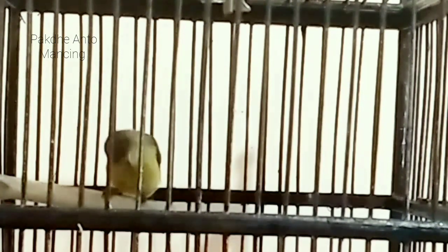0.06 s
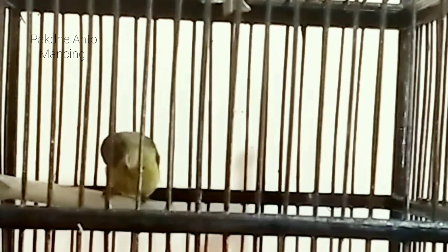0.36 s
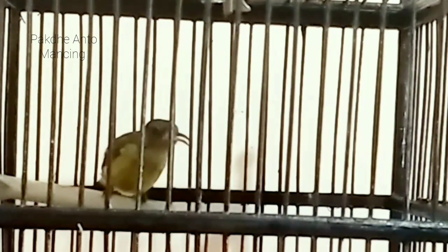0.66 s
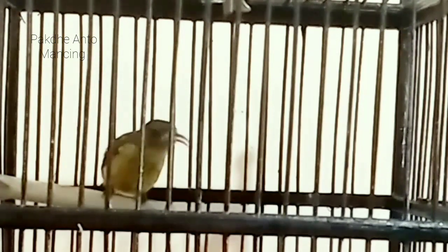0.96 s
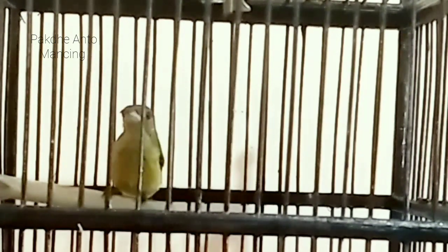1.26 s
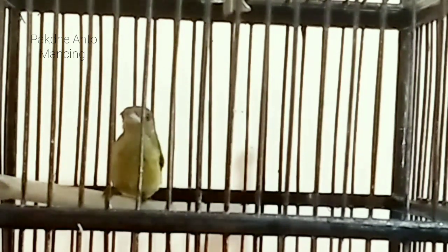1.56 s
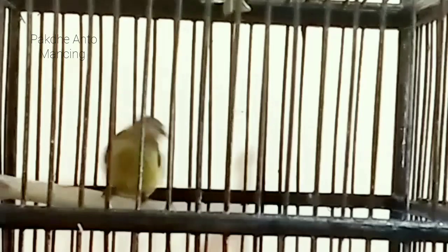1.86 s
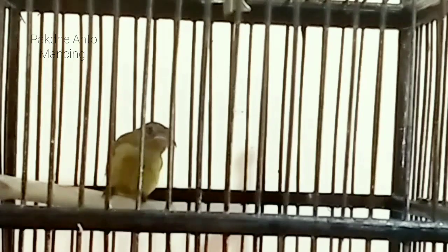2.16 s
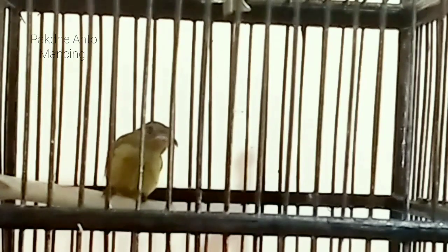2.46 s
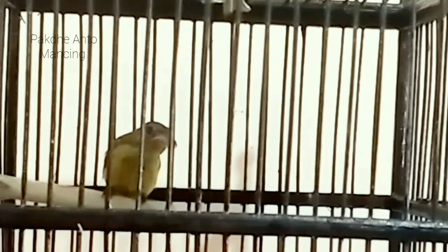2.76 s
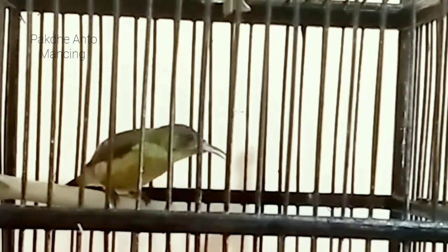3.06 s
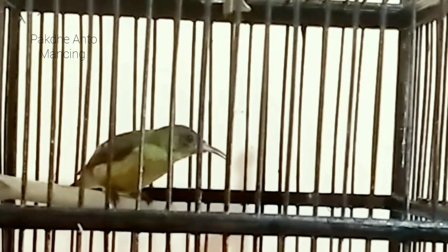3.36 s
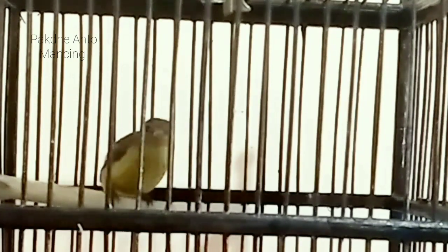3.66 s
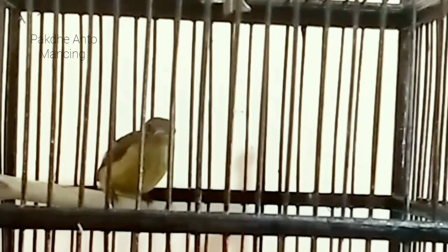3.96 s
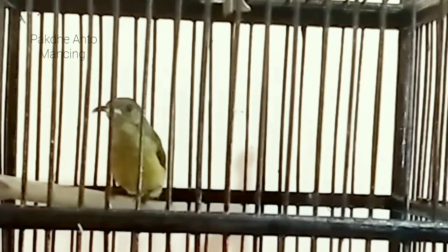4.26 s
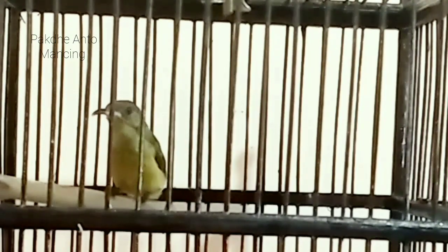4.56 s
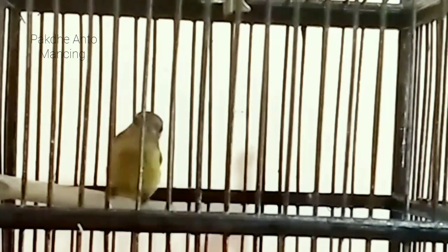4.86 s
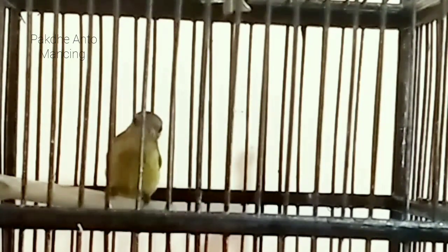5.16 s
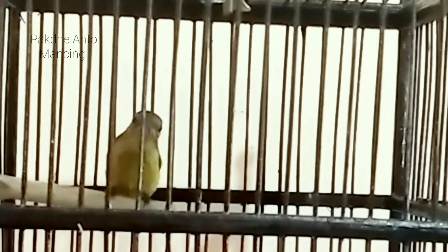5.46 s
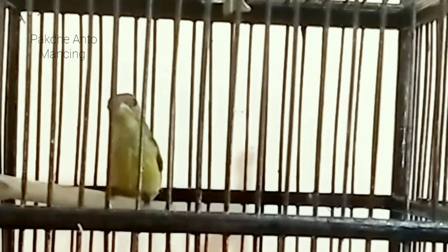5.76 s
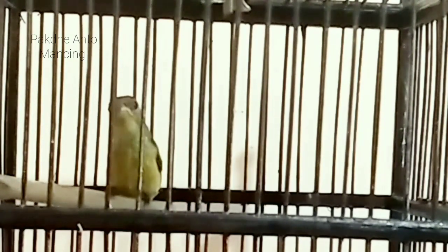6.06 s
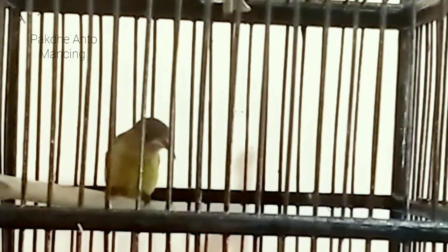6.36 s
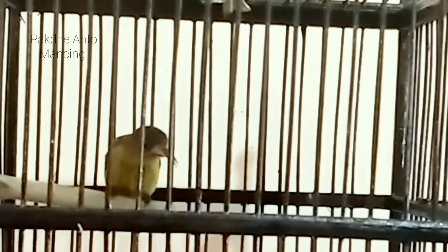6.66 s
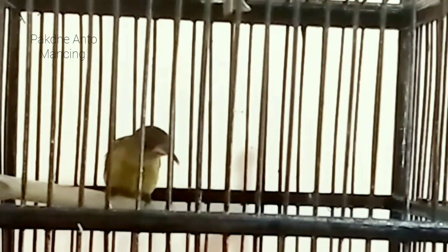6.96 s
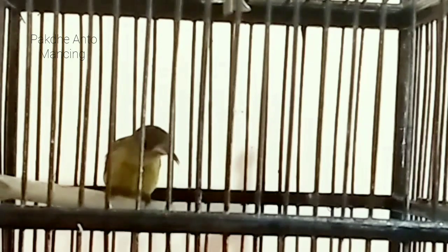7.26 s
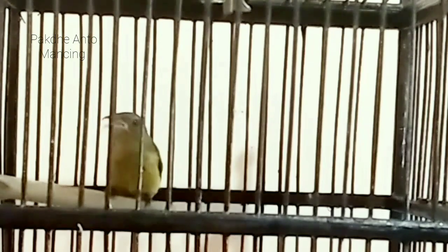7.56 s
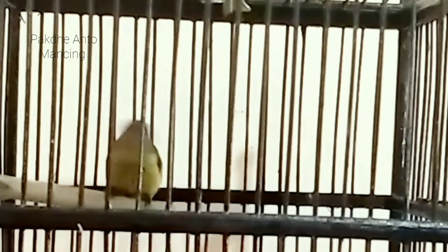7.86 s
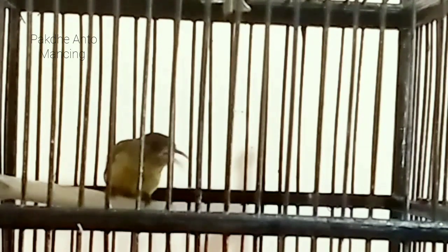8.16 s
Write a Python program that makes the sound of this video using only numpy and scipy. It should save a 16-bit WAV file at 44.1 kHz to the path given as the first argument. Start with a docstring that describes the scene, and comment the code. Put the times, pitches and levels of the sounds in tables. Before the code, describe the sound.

A small caged bird sings close to the microphone in a small, hard room. It opens with a wavering nasal call, winding whistles and one soft wing flick. After a pause come quick rising chirps and slides, then nasal notes alternating with arched whistles, and finally dry ticks and harsh, scratchy calls. A steady fan-like hum runs underneath.

```python
"""A sunbird sings in a wire cage, close to a pair of microphones in a small hard room.
Its syrinx gives nearly pure gliding whistles, and a buzz that the throat shapes into nasal notes,
dry ticks and harsh chacks. It flicks its wings once, and its voice shifts from side to side as it turns
its head. A steady hum, as of a fan, fills the room; the loudest notes just overload the recorder."""
import sys
import numpy as np
from scipy import signal
from scipy.fft import rfft, irfft
from scipy.io import wavfile
from scipy.ndimage import uniform_filter1d

SR = 44100
rng = np.random.default_rng(int(sys.argv[2]) if len(sys.argv) > 2 else 0)


def wav_out(sig):
    """Save sig, one row per channel (or a flat mono array), as 16-bit PCM at SR to the path in sys.argv[1]."""
    wavfile.write(sys.argv[1], SR, np.round(np.clip(np.atleast_2d(sig).T, -1, 1) * 32767).astype(np.int16))


N = 370440
WINDPIPE_HZ, BAND_LIMIT_HZ = 2690, 16500


def amp(db):
    """Decibels to gain."""
    return 10 ** (np.asarray(db) / 20)


def unit_rms(x):
    """Scales to rms 1."""
    return x / np.sqrt(np.mean(x ** 2) + 1e-20)


def curve_at(points, hz, column=1):
    """One column of a table, joined on a log-frequency axis."""
    columns = np.transpose(points)
    return np.interp(np.log(hz + 1), np.log(columns[0] + 1), columns[column])


def add(mix, start_s, sound):
    """Lays a sound into the mix."""
    at = int(round(start_s * SR)) + np.arange(len(sound))
    inside = (at >= 0) & (at < N)
    mix[at[inside]] += sound[inside]


def wobble(size, hz):
    """Smooth random movement of rms about 1, up to about hz."""
    padded = size + SR // 10
    f = np.fft.rfftfreq(padded, 1 / SR)
    return unit_rms(irfft(rfft(rng.standard_normal(padded)) * np.exp(-(f / hz) ** 2)))[:size]


def resonance(hz, centre_hz, width_hz):
    """Gain of a single resonance, 1 at its centre."""
    return 1 / np.sqrt(1 + ((hz ** 2 - centre_hz ** 2) / (width_hz * hz + 1e-9)) ** 2)


def band_noise(size, centre_hz, width_hz):
    """Noise through a resonance applied twice."""
    f = np.fft.rfftfreq(size, 1 / SR)
    return unit_rms(irfft(rfft(rng.standard_normal(size)) * resonance(f, centre_hz, width_hz) ** 2, size))


def gesture(rows, edge_s):
    """Turns timed breakpoints into a note's start, soft-edged gate and smoothed control curves."""
    times, *columns = np.transpose(rows)
    t = np.arange(times.min() - edge_s / 2, times.max() + edge_s / 2, 1 / SR)
    gate = np.sin(np.pi / 2 * np.clip(np.minimum(t - t[0], t[-1] - t) / edge_s, 0, 1)) ** 2
    return t[0], gate, [uniform_filter1d(np.interp(t, times, c), size=110) for c in columns]


# The broad colour of the hum. Each row: frequency in Hz, relative level in dB.
HUM_COLOUR = [(25, -45.5), (60, -39), (120, -32.5), (230, -28.5), (300, -23), (560, -19), (680, -7.5),
              (980, -2), (1300, -6.5), (1900, -2.5), (2300, -16.5), (4500, -19.5), (8300, -21),
              (10000, -31)]
# Resonances on top of that colour. Each row: centre in Hz, width in Hz, boost or cut in dB.
HUM_RESONANCES = [(154, 31, 4), (297, 7.7, 12.5), (646.6, 16, 6), (770.4, 27.5, 8.5), (948, 9.4, 11.5),
                  (1033, 20.4, 10), (1154, 14.3, 13), (1607, 17, 5.5), (1781, 21, 8.5), (2640, 290, 4.5),
                  (5600, 530, -1)]
# The hum's stereo image. Each row: frequency in Hz, left-right likeness 0-1, left's lead in radians.
HUM_IMAGE = [(60, 0.6, 0), (300, 0.73, 0), (450, 0.86, 1), (620, 0.36, 0.17), (870, 0.76, 1.34),
             (1178, 0.8, 3.5), (1510, 0.36, 3), (2000, 0.62, 4), (3000, 0.13, 5), (7000, 1, 4.5),
             (9900, 0.01, 6)]
# The hum's slow level ride. Each row: time in seconds, offset in dB.
HUM_RIDE = [(0, 2), (1.7, 0.5), (2.15, -0.6), (2.7, 0), (8.4, 0.43)]


def hum(level_db=-26.5, swell_db=1.5, swell_hz=11, balance_db=-0.06):
    """A bed of rushing air with narrow resonances, reaching the two microphones out of step."""
    f = np.fft.rfftfreq(N, 1 / SR)
    peaks_db = sum(db / (1 + (2 * (f - hz) / width) ** 2) for hz, width, db in HUM_RESONANCES)
    # standing waves in the room ripple the spectrum, mostly above the main resonances
    ripple_db = curve_at([(1000, .4), (1600, 1.2), (2400, 2.2)], f) * wobble(len(f), hz=130)
    left, unrelated = rfft(rng.standard_normal((2, N)))
    likeness = np.clip(curve_at(HUM_IMAGE, f), 0, 1)
    lead = curve_at(HUM_IMAGE, f, column=2)
    right = likeness * left * np.exp(-1j * lead) + np.sqrt(1 - likeness ** 2) * unrelated
    colour = amp(curve_at(HUM_COLOUR, f) + peaks_db + ripple_db)
    air = unit_rms(irfft(np.array([left, right]) * colour, N))
    ride_db = np.interp(np.arange(N) / SR, *np.transpose(HUM_RIDE))
    draught_db = swell_db * wobble(N, swell_hz)  # the draught is never quite even
    return air * amp(level_db + ride_db + draught_db + np.array([[balance_db], [-balance_db]]) / 2)


def moan(level_db=-39, centre_hz=1000, width_hz=260, depth_db=5.5, waver_hz=6):
    """The hum wavers: a band near its strongest resonance swells and fades a few times a second."""
    air = np.array([band_noise(N, centre_hz, width_hz) for side in range(2)])
    return amp(level_db) * unit_rms(air * amp(depth_db * wobble(N, waver_hz)))


# How long the room rings. Each row: frequency in Hz, seconds to fall by 60 dB.
ROOM_DECAY = [(500, 0.033), (2500, 0.32), (4500, 0.38), (6500, 0.41), (9000, 0.18)]


def room(sound, cage_db=-3, cage_decay_s=.007, tail_db=-12, build_s=.016):
    """Quick reflections from the cage, then a bright room tail in which the lows die first."""
    t = np.arange(SR // 2) / SR
    cage_taps, room_taps = rng.standard_normal((2, 2, len(t))) * (rng.random((2, 2, len(t))) < .12)
    cage = cage_taps * np.exp(-t / cage_decay_s) * (t > .0007)
    hz, frame_s, bands = signal.stft(room_taps, SR, nperseg=256)
    decay = amp(-60 * frame_s / curve_at(ROOM_DECAY, hz)[:, None])
    tail = signal.istft(bands * decay, SR, nperseg=256)[1][:, :len(t)] * (1 - np.exp(-t / build_s))
    echoes = sum(amp(db) * part / np.linalg.norm(part, axis=1, keepdims=True)
                 for db, part in [(cage_db, cage), (tail_db, tail)])
    return signal.fftconvolve(sound[None], echoes, axes=1)[:, :N]


# The wing flick. Each row: start and length in seconds, puff level in dB, rustle level in dB.
WING_FLICKS = [(0.945, 0.096, -38, -32)]


def wing_flick(row):
    """The wings push a low puff of air while the feathers rustle."""
    start, length, puff_db, rustle_db = row
    size = int(length * SR)
    feathers = band_noise(size, centre_hz=5500, width_hz=13000)
    rustle = unit_rms(feathers * amp(2.5 * wobble(size, hz=200)))
    puff = band_noise(size, centre_hz=320, width_hz=200)
    return start, np.hanning(size) * (amp(puff_db) * puff + amp(rustle_db) * rustle)


def breath(size, throat_hz, width_hz, pipe_width_hz=900, pipe_db=-9):
    """Turbulent air in the bird's voice, coloured by the throat and by a lower windpipe resonance."""
    throat = band_noise(size, throat_hz, width_hz)
    return unit_rms(throat + amp(pipe_db) * band_noise(size, WINDPIPE_HZ, pipe_width_hz))


def syrinx_buzz(pitch_hz, throat_hz, width_hz, fundamental_db, count=9, ceiling_hz=9500):
    """The throat favours harmonics that pass through its resonance; gives the buzz and its running rms."""
    k = np.arange(1, count + 1)[:, None]
    gains = resonance(k * pitch_hz, throat_hz, width_hz) * (k * pitch_hz < ceiling_hz)
    gains = gains * np.where(k == 1, amp(fundamental_db), 1)
    phase = 2 * np.pi * (k * np.cumsum(pitch_hz) / SR + rng.random((count, 1)))
    return (gains * np.sin(phase)).sum(0), np.sqrt((gains ** 2).sum(0) / 2 + 1e-9)


# Dry ticks. Each row: start and length in seconds, first and last pitch in Hz, level in dB before
# the trim, throat resonance and its width in Hz, share of the tick that stays fairly clear 0-1.
TICKS = [(-.012, .024, 2500, 2884, -15, 5600, 1480, 0.4), (7.08, 0.039, 2380, 4410, -17, 6760, 3520, 0.3),
         (7.206, .026, 4317, 2444, -14.5, 6470, 2800, .35),
         (7.329, 0.019, 2984, 2180, -20.5, 5200, 3980, .55),
         (7.504, .016, 1973, 2810, -16.5, 5900, 2450, 0.9),
         (7.753, 0.0156, 3360, 2680, -17, 6700, 3000, 0.4),
         (8.087, 0.015, 2750, 2275, -20, 5200, 4000, .65)]


def tick(row, trim_db=-2, start_rough=.35, break_share=.14, jitter=.13, hiss_share=.6, crackle_db=4):
    """A tiny reedy note sweeps up or down, fairly clear at first, then breaks up into a scratch."""
    start, length, first_hz, last_hz, db, throat_hz, width_hz, clear = row
    u = np.linspace(0, 1, max(int(length * SR), 64))
    rough = start_rough + (1 - start_rough) * (1 + np.tanh((u - clear) / break_share)) / 2
    hz = first_hz * (last_hz / first_hz) ** u * (1 + jitter * rough * wobble(len(u), hz=1100))
    buzz = unit_rms(syrinx_buzz(hz, throat_hz, width_hz, fundamental_db=6)[0])
    air = breath(len(u), throat_hz, 1.3 * width_hz, pipe_width_hz=390, pipe_db=-6.5)
    hiss = unit_rms(air * amp(crackle_db * wobble(len(u), hz=500)))
    noisy = hiss_share * rough
    swell = abs(np.sin(np.pi * u)) ** 0.48
    return start, amp(db + trim_db) * swell * (np.sqrt(1 - noisy) * buzz + np.sqrt(noisy) * hiss)


# Harsh chacks. Each row: start and length in seconds, first and last pitch in Hz, level in dB,
# lower throat resonance in Hz, its gain in dB against the upper one.
CHACKS = [(7.66, .043, 855, 1714, -11, 4960, -10.5), (7.944, 0.044, 861, 1818, -11, 4660, -9),
          (8.24, .044, 833, 1727, -11, 4960, -7.5)]


def chack(row, upper_hz=6700, clears_at=.45, hiss_floor=.1, jitter=.05, crackle_db=2.5):
    """A scratch clears into a rising buzz whose harmonics flash through the sharp, wide-open throat."""
    start, length, first_hz, last_hz, db, lower_hz, lower_db = row
    envelope = [(start, -9), (start + .45 * length, 0), (start + length, -3)]  # seconds, dB
    start, gate, (swell_db,) = gesture(envelope, edge_s=.004)
    u = np.linspace(0, 1, len(gate))
    rough = np.clip(hiss_floor + np.exp(-(u / clears_at) ** 2), 0, 1)
    hz = first_hz * (last_hz / first_hz) ** u * (1 + jitter * np.sqrt(rough) * wobble(len(u), hz=219))
    k = np.arange(1, 11)[:, None]
    phase = 2 * np.pi * (k * np.cumsum(hz) / SR + rng.random(k.shape))
    buzz = unit_rms((np.sin(phase) * (k * hz < BAND_LIMIT_HZ)).sum(0))
    scratch = unit_rms(rng.standard_normal(len(u)) * amp(crackle_db * wobble(len(u), hz=700)))
    drive = gate * amp(swell_db) * (np.sqrt(1 - rough) * buzz + np.sqrt(rough) * scratch)
    f = np.fft.rfftfreq(len(u), 1 / SR)
    throat = (resonance(f, upper_hz, width_hz=860) * resonance(f, upper_hz, width_hz=3500)
              + amp(lower_db) * resonance(f, lower_hz, width_hz=950) ** 2
              + amp(-15) * resonance(f, WINDPIPE_HZ, width_hz=400) ** 2)
    return start, amp(db) * unit_rms(irfft(rfft(drive) * throat, len(u)))


def nasal_voice(rows, jitter, fray, throat_width_hz, trim_db, hoarse_db, flutter_db):
    """A hoarse buzz through the throat, with a breathy catch at the start; fray shakes its ending."""
    start, gate, (hz, db, throat_hz, fundamental_db) = gesture(rows, edge_s=0.0037)
    size = len(hz)
    shake = (jitter + fray * np.linspace(0, 1, size) ** 2) * wobble(size, hz=494)
    buzz, buzz_rms = syrinx_buzz(hz * (1 + shake), throat_hz, throat_width_hz, fundamental_db)
    catch = amp(-2) * np.exp(-np.arange(size) / SR / 0.0051)
    hiss = (amp(hoarse_db) + catch) * breath(size, throat_hz=5200, width_hz=3500)
    flutter = flutter_db * wobble(size, hz=400)
    return start, gate * amp(db + trim_db + flutter) * (buzz / buzz_rms + hiss)


# Short nasal notes. Each row: start and length in seconds, pitch in Hz, drift in Hz per second,
# level in dB before the trim, opening throat resonance in Hz, depth of the scoop 0-1.
SCOOPS = [(5.06, 0.059, 2000, -2200, -16.5, 7300, 0.05), (5.316, 0.045, 1953, 694, -16.5, 5600, 0.23),
          (5.614, 0.051, 2176, -1400, -18, 5500, .17), (5.887, 0.061, 1937, 1495, -17.5, 5500, 0.12)]


def scoop(row, scoop_s=0.00634, shut_throat_hz=4130, fundamental_db=3):
    """A nasal note scoops up to its pitch, swells and fades; its resonance sinks as the throat narrows."""
    start, length, pitch_hz, drift, db, open_throat_hz, depth = row
    t = np.linspace(0, length, num=40)
    hz = pitch_hz * (1 - depth * np.exp(-t / scoop_s)) + drift * t
    swell_db = np.interp(t / length, [0, 0.29, 1], [-8, 0, -7])
    throat_hz = open_throat_hz + (shut_throat_hz - open_throat_hz) * (t / length) ** 2
    rows = np.column_stack([start + t, hz, db + swell_db, throat_hz, np.full_like(t, fundamental_db)])
    return nasal_voice(rows, jitter=.013, fray=.016, throat_width_hz=2000,
                       trim_db=-2, hoarse_db=-12, flutter_db=1.5)


# The course of the long nasal call. Each row: time in seconds, pitch in Hz, level in dB before
# the trim, lift of the fundamental in dB.
WHINE_COURSE = [(0.222, 2550, -19, 8), (0.242, 3080, -26.5, 5), (0.266, 2610, -15, 13),
                (0.282, 2670, -11.5, 6), (0.306, 2706, -8, 4.5), (0.319, 2443, -16, 10),
                (0.342, 2453, -17, 11), (0.356, 2577, -21, 19), (0.378, 2530, -20, 25),
                (0.394, 2564, -14, 18), (0.419, 2616, -22, 19)]


def whine(course, throat_hz=5080):
    """A wavering call through a narrow throat that stays put; its lowest tone grows toward the end."""
    rows = [(s, hz, db, throat_hz, fundamental_db) for s, hz, db, fundamental_db in course]
    return nasal_voice(rows, jitter=.0041, fray=0, throat_width_hz=310,
                       trim_db=-3, hoarse_db=-13.5, flutter_db=2.5)


def whistle(rows, jitter=.0033, glide_jitter=.026, rough_jitter=.102, fast_glide_hz_per_s=200000,
            scrape_db=-16, breath_db=-4, flutter_db=1.3, rough_flutter_db=3):
    """A nearly pure tone with a weak octave and breath; roughness shakes it, fast glides also scrape."""
    start, gate, (hz, db, octave_db, rough) = gesture(rows, edge_s=.003)
    size = len(hz)
    strain = np.tanh(uniform_filter1d(abs(np.gradient(hz)) * SR, size=300) / fast_glide_hz_per_s)
    shake = (jitter + glide_jitter * strain ** 2 + rough_jitter * rough) * wobble(size, hz=700)
    phase = 2 * np.pi * np.cumsum(hz * (1 + shake)) / SR
    tone = np.sqrt(2) * (np.sin(phase) + amp(octave_db) * np.sin(2 * phase))
    air = breath(size, throat_hz=5000, width_hz=19000)
    scrape = (amp(scrape_db) * strain + amp(octave_db + breath_db)) * air
    flutter = flutter_db * wobble(size, hz=253) + rough_flutter_db * rough * wobble(size, hz=800)
    return start, gate * amp(db + flutter) * (tone + scrape)


# Leaping chirps. Each row: start, dwell, leap and fall in seconds, pitch in Hz at the start,
# before the leap, at the top and at the end, low and top level in dB.
CHIRPS = [(.213, 0.0093, 0.018, 0.0096, 4260, 4440, 6700, 6260, -22, -23.5),
          (2.398, 0.024, 0.0092, .003, 4310, 3796, 5700, 5650, -21.5, -17),
          (2.587, 0.014, 0.014, 0.0072, 4100, 3740, 6440, 6550, -25, -23),
          (2.626, .003, 0.0086, 0.019, 4050, 4120, 5680, 5490, -22, -16),
          (2.758, 0.019, 0.026, 0.0092, 3200, 3870, 8040, 7700, -26, -16.5),
          (2.909, .015, .025, 0.015, 4200, 4600, 7640, 6070, -17.5, -14),
          (3.059, 0.02, 0.015, 0.024, 4260, 4440, 7290, 5820, -13, -9),
          (3.249, 0.014, 0.023, 0.019, 3710, 4250, 8140, 8160, -20.5, -16.5)]


def chirp(row, onset_db=-8, onset_s=0.0025, leap_db=1.0, fade_db=-4, top_octave_db=-25):
    """A low whistle, buzzy when soft, sags or creeps up, scrapes as it leaps to a purer top, then fades."""
    start, dwell, leap, fall, first_hz, knee_hz, top_hz, last_hz, low_db, top_db = row
    t = np.linspace(0, dwell + leap + fall, num=60)
    settled = 1 - (1 - np.minimum(t / dwell, 1)) ** 2
    height = np.sin(np.pi / 2 * np.clip((t - dwell) / leap, 0, 1) ** 1.2) ** 2
    slip = np.maximum(t - dwell - leap, 0) / fall
    low_hz = first_hz + (knee_hz - first_hz) * settled
    hz = low_hz + (top_hz - knee_hz) * height + (last_hz - top_hz) * slip
    swell_db = onset_db * np.exp(-t / onset_s) + leap_db * np.sin(np.pi * height) ** 2
    db = low_db + (top_db - low_db) * height + swell_db + fade_db * slip ** 2
    low_octave_db = np.interp(low_db, [-25, -14], [-5, -26])  # a softer start has more octave
    octave_db = low_octave_db + (top_octave_db - low_octave_db) * height
    rough = np.interp(height, [0, .5, 1], [.33, .7, .17])
    return whistle(np.column_stack([start + t, hz, db, octave_db, rough]))


# Quick slides. Each row: start and length in seconds, first and last pitch in Hz, level in dB,
# octave in dB against the fundamental.
SLIDES = [(4.489, 0.0057, 8550, 8970, -18, -23), (4.546, 0.0043, 7520, 4270, -15, -21),
          (4.551, 0.017, 3830, 8020, -10, -43), (4.841, 0.022, 5430, 7680, -15.5, -34),
          (4.883, 0.031, 6980, 5000, -7.5, -34), (5.946, 0.039, 2400, 2870, -26.5, -11),
          (6.597, 0.014, 8330, 8980, -12.5, -30), (6.716, 0.015, 8030, 8870, -16, -34),
          (8.254, 0.0099, 4430, 7000, -9.5, -30)]


def slide(row, bend=1.8, ends_db=-8, low_rough=0.42):
    """A whistle slides up or down, lingering near the top, loudest midway and rougher at its low end."""
    start, length, first_hz, last_hz, middle_db, octave_db = row
    u = np.linspace(0, 1, num=30)
    below_top = (u if first_hz > last_hz else 1 - u) ** bend
    hz = max(first_hz, last_hz) - abs(last_hz - first_hz) * below_top
    db = middle_db + ends_db * (2 * u - 1) ** 2
    rough = low_rough * np.sqrt(below_top)
    return whistle(np.column_stack([start + length * u, hz, db, np.full_like(u, octave_db), rough]))


# Arched whistles, each after a nasal note. Each row: start, rise and fall in seconds,
# first, top and last pitch in Hz, full-voice and raspy-voice level in dB.
ARCHES = [(5.126, 0.048, .046, 3100, 4676, 2920, -14, -24), (5.373, .045, .051, 3074, 4720, 2530, -13, -19),
          (5.674, .023, .066, 3630, 5080, 3010, -11, -21.5),
          (5.982, .037, 0.056, 3000, 4870, 2544, -17.5, -18)]


def arch(row, bend=1.4, opens_hz=4080, closes_hz=3800, break_width_hz=50, ends_db=-4):
    """The pitch climbs and falls away; the raspy voice breaks open, loud and pure, while it is high."""
    start, rise, fall, first_hz, top_hz, last_hz, full_db, raspy_db = row
    t = np.linspace(-rise, fall, num=90)
    below_top = abs(t / np.where(t < 0, rise, fall)) ** bend  # bend 1 is a pointed top, 2 a round one
    hz = top_hz + below_top * (np.where(t < 0, first_hz, last_hz) - top_hz)
    full = (1 + np.tanh((hz - np.where(t < 0, opens_hz, closes_hz)) / break_width_hz)) / 2
    db = raspy_db + (full_db - raspy_db) * full + ends_db * below_top ** 2
    octave_db = np.interp(full, [0, 1], [-17, -34])
    rough = np.interp(full, [0, 1], [.5, .075])
    return whistle(np.column_stack([start + rise + t, hz, db, octave_db, rough]))


# Winding whistles, one list per note. Each row: time in seconds, pitch in Hz, level in dB.
WARBLES = [
    [(0.705, 4400, -28.5), (0.725, 4270, -22.5), (0.735, 5200, -18), (0.777, 5520, -13.5),
     (0.791, 5610, -12.5), (0.807, 5070, -9), (0.815, 4090, -15), (0.825, 4150, -13), (0.84, 4530, -13)],
    [(.972, 4620, -26), (.982, 4180, -26.5), (.991, 5200, -23), (1.003, 5210, -22), (1.016, 5360, -21),
     (1.023, 5450, -27)],
    [(1.035, 6050, -24), (1.050, 5620, -13.5), (1.069, 4780, -11), (1.093, 4200, -15), (1.105, 4270, -25)],
    [(4.166, 6220, -23), (4.178, 6950, -23.5), (4.187, 7190, -21.5), (4.192, 5300, -19), (4.198, 4240, -25),
     (4.203, 5500, -13), (4.209, 4320, -20.5), (4.218, 5060, -18), (4.232, 5530, -25)],
    [(6.287, 2457, -29), (6.321, 2760, -15), (6.345, 2642, -21), (6.353, 2700, -12.5), (6.367, 3155, -23),
     (6.381, 3560, -14.5), (6.403, 3700, -13), (6.409, 3837, -16.5), (6.43, 3820, -15.5)],
]


def warble(course, octave_db=-30, rough=0):
    """A long, pure whistle with its own winding course."""
    return whistle([(s, hz, db, octave_db, rough) for s, hz, db in course])


# The pan as the bird turns its head. Each row: time in seconds, left minus right in dB.
HEAD_TURNS = [(0.32, -4.5), (0.77, -11), (1.04, -8), (2.53, 1), (2.86, -7), (3.08, 3.5), (3.27, -2),
              (4.2, -6.5), (4.55, -6), (4.88, -5.5), (5.14, -7), (5.39, -3.5), (5.69, -8), (5.98, -4.5),
              (6.36, -1.5), (6.67, 0), (7.3, -2.5), (7.69, -8), (7.97, -4), (8.27, -1.5)]


def direct_sound(bird, lag_samples=4):
    """The bird reaches the left microphone slightly later, and pans as it turns its head."""
    pair = np.array([np.pad(bird, (lag_samples, 0))[:N], bird])
    pan_db = np.interp(np.arange(N) / SR, *np.transpose(HEAD_TURNS))
    return pair * amp(np.array([pan_db, -pan_db]) / 2)


def scene():
    """The bird up close, with its echoes, over the wavering hum."""
    bird = np.zeros(N)
    for source, table in [(chirp, CHIRPS), (arch, ARCHES), (slide, SLIDES), (warble, WARBLES),
                          (scoop, SCOOPS), (whine, [WHINE_COURSE]), (tick, TICKS), (chack, CHACKS),
                          (wing_flick, WING_FLICKS)]:
        for entry in table:
            add(bird, *source(entry))
    return direct_sound(bird) + room(bird) + hum() + moan()


# The tone of the microphones. Each row: frequency in Hz, gain in dB.
MIC_RESPONSE = [(2400, -0.5), (2800, -2), (3300, -0.5), (4300, 1), (7000, -2), (8200, -3.5), (9000, -10.5),
                (9600, -18.5), (10600, -39.5), (12000, -42)]


def record(dry, knee=0.82, hiss_db=-82):
    """The microphones colour the sound; the recorder squashes peaks, adds faint hiss and cuts the top."""
    response = amp(curve_at(MIC_RESPONSE, np.fft.rfftfreq(2 * N, 1 / SR)))
    coloured = irfft(rfft(dry, 2 * N) * response)[:, :N]
    below_knee = np.clip(coloured, -knee, knee)
    squashed = below_knee + (1 - knee) * np.tanh((coloured - below_knee) / (1 - knee))
    hiss = amp(hiss_db) * rng.standard_normal((2, N))
    lowpass = signal.firwin(255, BAND_LIMIT_HZ, window=("kaiser", 8), fs=SR)
    return signal.oaconvolve(squashed + hiss, lowpass[None], "same", axes=1)


dry = scene()
out = record(dry)
wav_out(out)
```